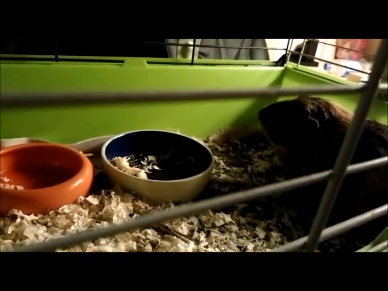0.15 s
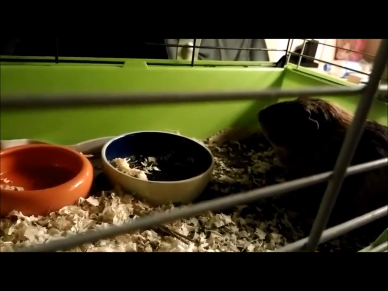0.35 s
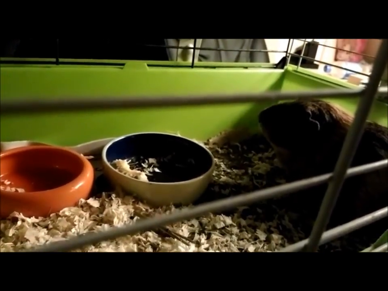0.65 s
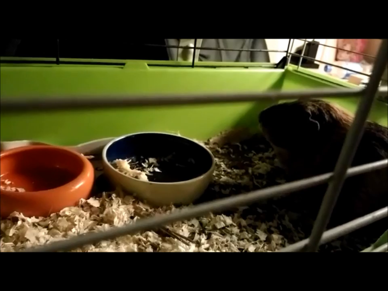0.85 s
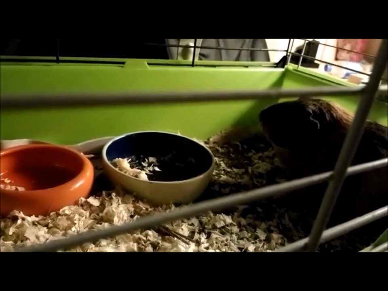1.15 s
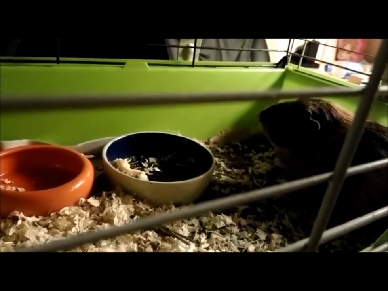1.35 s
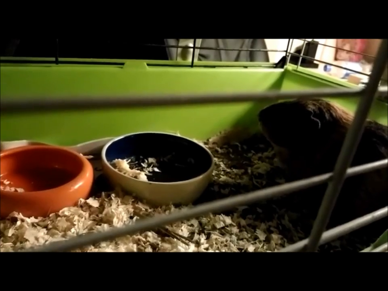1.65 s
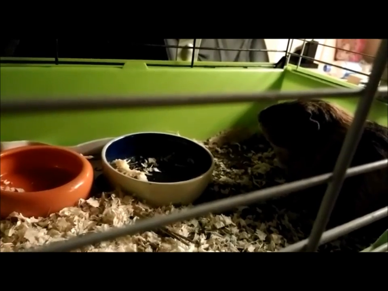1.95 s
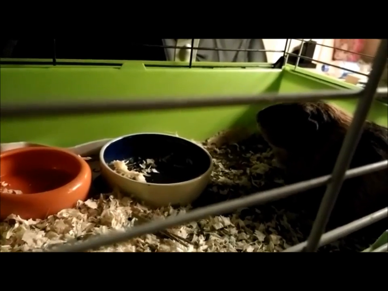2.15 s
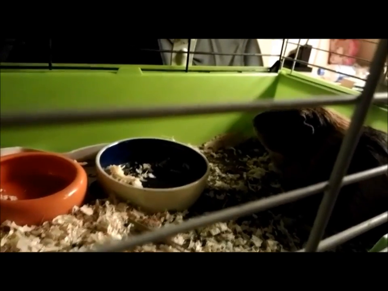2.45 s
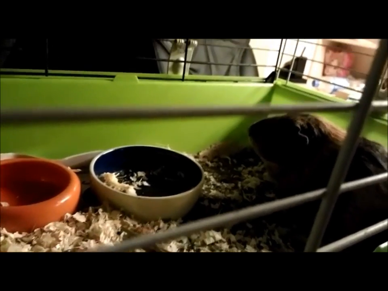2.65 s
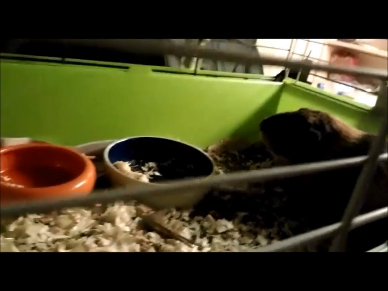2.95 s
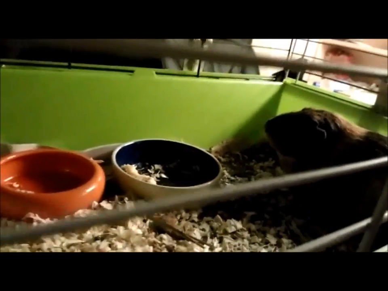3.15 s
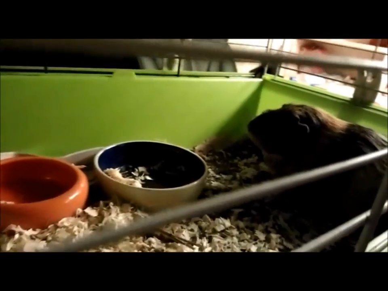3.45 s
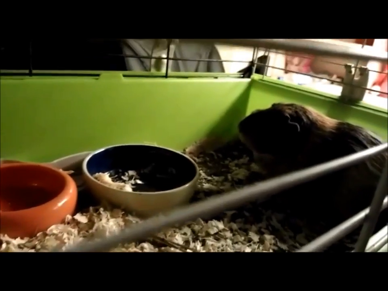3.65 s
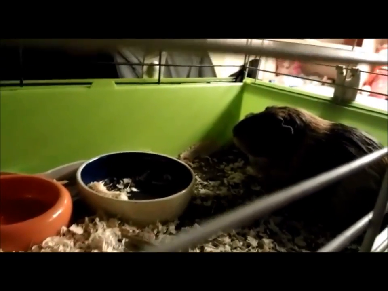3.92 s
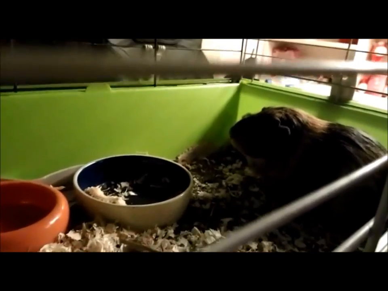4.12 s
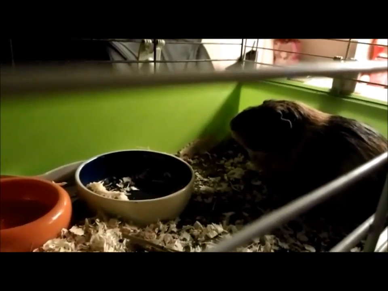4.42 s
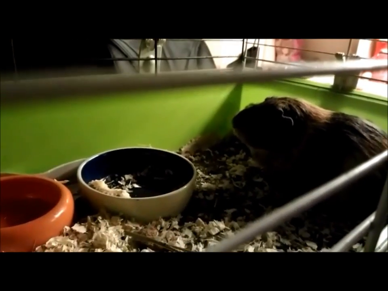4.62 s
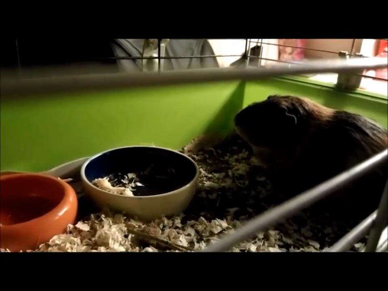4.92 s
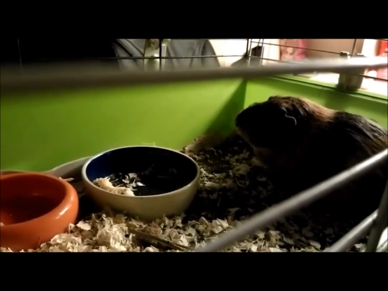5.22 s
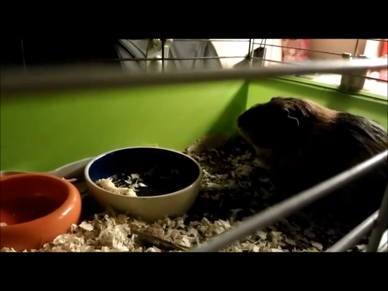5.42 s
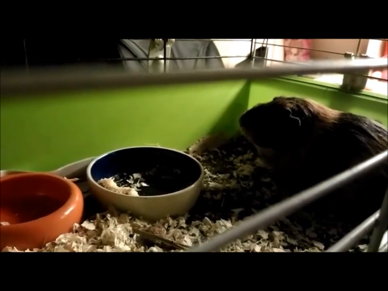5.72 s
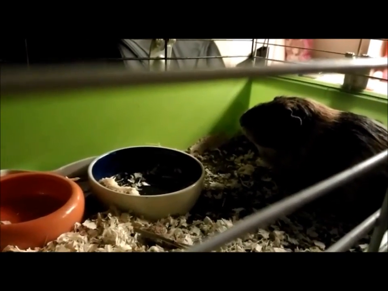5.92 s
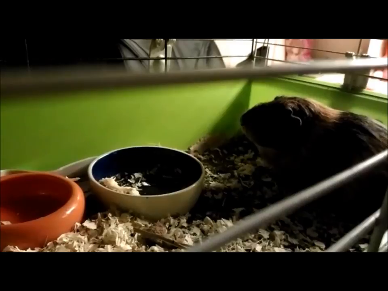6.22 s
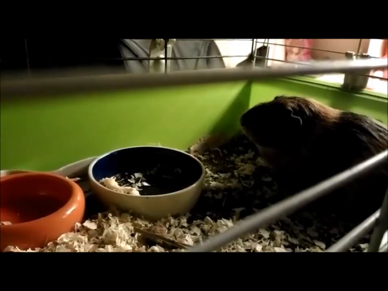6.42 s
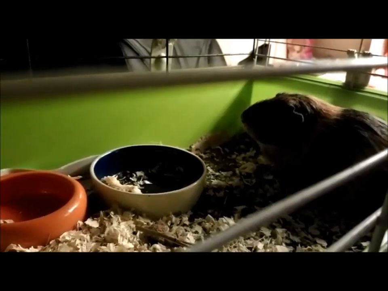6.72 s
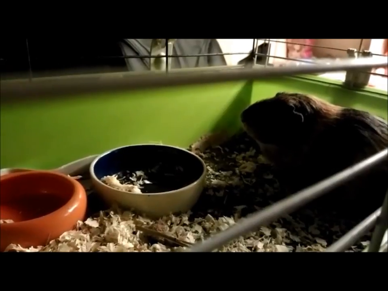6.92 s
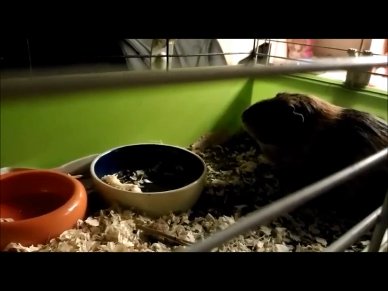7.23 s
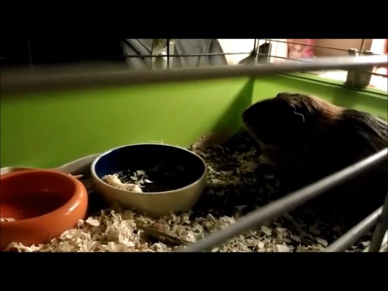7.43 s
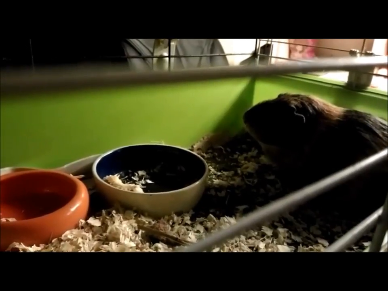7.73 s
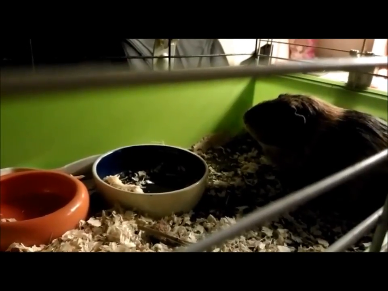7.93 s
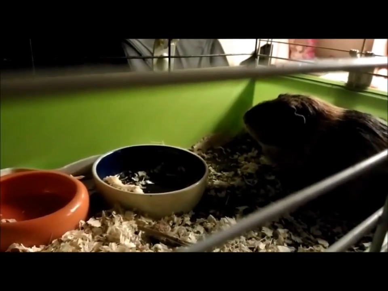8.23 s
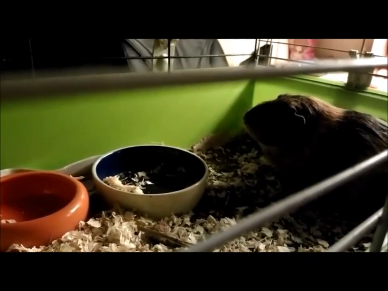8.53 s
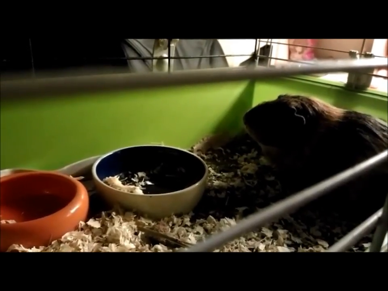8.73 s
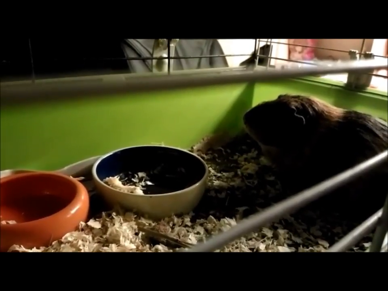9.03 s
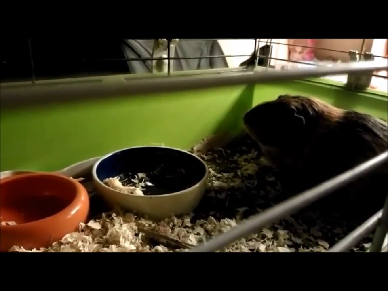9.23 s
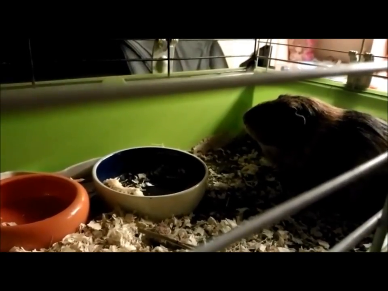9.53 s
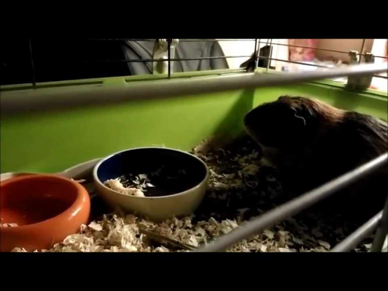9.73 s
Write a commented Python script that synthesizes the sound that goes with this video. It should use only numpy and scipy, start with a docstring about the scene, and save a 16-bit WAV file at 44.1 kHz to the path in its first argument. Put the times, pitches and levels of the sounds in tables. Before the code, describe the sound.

A guinea pig squeaks close to a hand-held microphone in a quiet room. From 0 to 2.9 s it calls steadily, about every 0.22 s: each squeak is a bright whistle of some 0.05 s, falling from roughly 3.6 to 3 kHz with strong overtones, closed by a tiny raspy puff and short echoes of cage walls and room. Around 2.8-2.9 s sharp ticks with a dull tray thump rattle, the last loudest, followed by a soft low bump at 3.0. A duller squeak lingers low at 3.26. Shavings rustle and tick lightly at 3.4-3.8 while the faint room noise sinks. Weak, hoarse calls come at 4.36 and 4.58 with more ticks. From 4.85 the second run builds, a little softer, alternating slightly uneven gaps of 0.2-0.3 s, with barely audible low thuds, continuing to the end near 9.9 s.

```python
"""A plastic cage in a quiet room: a guinea pig squeaks in two long runs, close to a hand-held camera.
Each squeak is a falling whistle whose overtones sweep through fixed throat resonances; a raspy puff ends it.
Between the runs its eagerness flags, and the calls turn dull and linger low.
Cage walls and room answer with decaying noise echoes. Shavings rustle as grainy noise, sharp ticks ring a few
short modes over a tray thump, soft low thuds bump the camera, and it turns the faint room noise down in the pause."""
import sys
import numpy as np
from scipy import signal
from scipy.fft import rfft, irfft, next_fast_len
from scipy.io import wavfile
from scipy.ndimage import map_coordinates

SR = 44100
rng = np.random.default_rng(int(sys.argv[2]) if len(sys.argv) > 2 else 0)


def pcm_store(signal):
    """Save signal as 16-bit PCM."""
    levels = np.round(np.clip(np.atleast_2d(signal), -1, 1) * 32767)
    wavfile.write(sys.argv[1], SR, levels.astype(np.int16).T)


N = 435266

# relative spectrum of the raspy breath: frequency_hz, density_db (per Hz)
BREATH_COLOUR = [(70, -33), (250, -8.5), (500, -18.5), (900, -23.5), (1300, -16.5), (2000, -8.5),
                 (3200, -14.5), (4200, -19.5), (5300, -17.5), (8000, -16), (9300, 0), (10900, 1.5),
                 (12500, -12), (14000, -10.5)]
ONSET_S = .003  # attack of a squeak's gate; also the shortest fall or linger of its pitch


def amp(db):
    """Decibels to gain."""
    return 10 ** (np.asarray(db) / 20)


def unit(x):
    """x at rms 1."""
    return x / np.sqrt(np.mean(x ** 2) + 1e-20)


def along(points, hz):
    """Values of (frequency_hz, value) points, read on a log frequency axis."""
    point_hz, values = np.transpose(points)
    return np.interp(np.log(hz + 1), np.log(np.sort(point_hz)), values)


def filtered(x, gain):
    """x times a gain that depends on frequency."""
    size = next_fast_len(len(x) + 8192)
    spectrum = rfft(x, size) * gain(np.fft.rfftfreq(size, 1 / SR))
    return irfft(spectrum, size)[:len(x)]


def noise(colour, size):
    """Coloured noise of rms 1."""
    white = rng.standard_normal(size)
    return unit(filtered(white, lambda hz: amp(along(colour, hz))))


def wobble(rate, size):
    """A smooth random curve, rate knots a second."""
    knots = rng.standard_normal(size // 8 + 4)
    return map_coordinates(knots, [np.arange(size) * rate / SR], mode="mirror")


def add(track, start_s, sound):
    """Mix a sound into a track; whatever lies outside the scene is cut off."""
    start = round(start_s * SR)
    part = sound[max(0, -start):max(0, N - start)]
    track[max(0, start):][:len(part)] += part


def with_echoes(x, echoes, echo_db):
    """Direct sound plus an echo pattern scaled to a total energy of echo_db."""
    response = amp(echo_db) * echoes / np.linalg.norm(echoes)
    response[0] += 1
    return signal.fftconvolve(x, response)


def room(x, wet_db=-14.5, build_s=0.011):
    """A short sound with the room's diffuse tail, which builds up, then decays at a rate set by frequency."""
    # decay time of the room: frequency_hz, t60_s
    room_decay = [(200, 0.17), (3000, 0.26), (7000, 0.3), (11000, 0.18), (14000, 0.18)]
    hz, t, bands = signal.stft(rng.standard_normal(SR // 2), SR, nperseg=256)
    decay = amp(-60 * t / along(room_decay, hz)[:, None])
    tail = signal.istft(bands * decay, SR, nperseg=256)[1]
    build_up = 1 - np.exp(-np.arange(len(tail)) / SR / build_s)
    return with_echoes(x, tail * build_up, wet_db)


def walls(x, echo_db, t60_s=0.071, first_echo_s=.007):
    """Direct sound and its quick echoes off the cage walls: decaying noise after a short gap."""
    t = np.arange(SR // 8) / SR
    echoes = rng.standard_normal(len(t)) * amp(-60 * t / t60_s) * (t > first_echo_s)
    return with_echoes(x, echoes, echo_db)


def room_noise(gain_db=2, flutter_db=1):
    """Faint indoor rumble and hiss, turned down by the camera in the pause, with a small random flutter of level."""
    # level before gain_db: time_s, level_db
    floor_level = [(0, -75.5), (2.899, -75), (3.9, -81), (4.9, -76.5), (9.87, -76)]
    # relative spectrum: frequency_hz, density_db (per Hz)
    floor_colour = [(25, -9), (37, -14), (48, -4), (62, -10), (85, 4.5), (102, -1), (200, -3.5),
                    (300, -7.5), (500, -9.5), (900, -11.5), (1800, -10), (4500, -18), (14000, -24)]
    level_db = np.interp(np.arange(N) / SR, *np.transpose(floor_level))
    return amp(level_db + gain_db + flutter_db * wobble(20, N)) * noise(floor_colour, N)


def bumps(gain_db=-3, bump_hz=130, rise_s=0.008):
    """The hand shifts on the camera body: low noise that swells and dies within a few hundredths of a second."""
    # soft bumps: peak_s (when it swells highest), level_db (before gain_db)
    hand_bumps = [(0.098, -51), (2.525, -54), (2.991, -39), (6.087, -51), (6.817, -53.5), (7.539, -51.5),
                  (9.346, -53)]
    track, t = np.zeros(N), np.arange(SR // 8) / SR
    swell = t / rise_s * np.exp(-t / rise_s)
    for peak_s, level_db in hand_bumps:
        thud = noise([(bump_hz / 2, -14), (bump_hz, 0), (bump_hz * 2, -12), (1000, -50)], len(t))
        add(track, peak_s - rise_s, amp(level_db + gain_db) * thud * swell)
    return track


def shavings(grain_db=6):
    """Dry flakes crackle under the feet: noise with fast random swings of level."""
    # stirs of the feet: centre_s, spread_s (to 1/e on either side), level_db
    stirs = [(2.822, 0.03, -61.5), (3.447, 0.084, -69), (3.584, 0.045, -65.5), (3.729, 0.011, -74),
             (3.813, 0.011, -72), (4.116, .09, -83), (4.358, 0.0047, -55), (4.529, .02, -67)]
    # relative spectrum of the rustle: frequency_hz, density_db (per Hz)
    rustle_colour = [(300, 0), (1500, -5.5), (5000, -14), (8000, -15.5), (11500, -1), (14000, -5)]
    t = np.arange(N) / SR
    stir = sum(amp(level_db) * np.exp(-np.minimum(((t - centre_s) / spread_s) ** 2, 20))
               for centre_s, spread_s, level_db in stirs)
    grain = amp(grain_db * np.clip(wobble(400, N), -2, 2))
    return stir * unit(noise(rustle_colour, N) * grain)


def ticks(tick_db=0, crack_db=-7, thump_gain_db=0, thump_t60_s=0.019):
    """Small hard contacts: ringing modes and a noise crack on top of a dull thump of the plastic tray."""
    # sharp ticks in the cage: start_s, level_db, thump_db (relative to level_db)
    contacts = [(2.812, -42, -20), (2.8393, -32.5, -7), (2.9007, -21.5, -12.5), (3.466, -45.5, -28),
                (3.491, -41.5, -26), (3.541, -50.5, -15), (4.353, -38.5, -21), (4.553, -48, -21),
                (4.5694, -38.5, -29), (4.843, -45.5, -19.5)]
    # what a tick rings with: frequency_hz, level_db (relative to the tick), t60_s
    modes = [(4080, -20.5, .018), (5230, -10.5, 0.0046), (8410, -3, 0.00087), (9740, 2, 0.0038),
             (13700, -15.5, .002)]
    # relative spectrum of the tray thump: frequency_hz, density_db (per Hz)
    tray_colour = [(30, -19), (70, -18.5), (200, 4.5), (400, -11), (800, -22), (1600, -31.5), (4000, -36.5)]
    track, t = np.zeros(N), np.arange(SR // 20) / SR
    for start_s, level_db, thump_db in contacts:
        # each contact excites the modes slightly differently
        snap = sum(amp(mode_db + rng.normal(0, 0.76) - 60 * t / t60_s) * np.sin(2 * np.pi * hz * t)
                   for hz, mode_db, t60_s in modes)
        crack = amp(crack_db - 60 * t / 0.0015) * noise([(1500, -14.5), (5500, 1), (12000, 2)], len(t))
        thump = amp(thump_db + thump_gain_db - 60 * t / thump_t60_s) * noise(tray_colour, len(t))
        add(track, start_s, room(amp(level_db + tick_db) * (snap + crack + thump), wet_db=-25))
    return track


def glide(t, length, top_hz, hold, end_hz, linger, jitter, bend=1.84,
          scoop_hz=120, scoop_s=0.004, sag_hz_per_s=12500):
    """Pitch of a squeak: it scoops up, holds and falls; a listless one then lingers low and finally sags."""
    linger = np.clip(linger, 0, length / 2)
    low_hz = end_hz + sag_hz_per_s * linger  # the longer the linger, the further it sags to the end pitch
    fall = np.clip((t - hold) / max(length - linger - hold, ONSET_S), 0, 1) ** bend
    sag = (low_hz - end_hz) * np.clip((t - length + linger) / max(linger, ONSET_S), 0, 2) ** 2
    scoop = scoop_hz * np.exp(-t / scoop_s)
    pitch = top_hz - (top_hz - low_hz) * fall - sag - scoop
    return pitch * (1 + jitter * wobble(500, len(t)))


def squeak(t, length, linger, pitch, levels_db, dull_db=6, ring_db_per_s=700, low_hz=3000,
           rasp_db=-45, opening_db=6.5, opening_share=0.16):
    """A whistle drags its overtones through fixed throat resonances, with a faint rasp of air on it."""
    # push of air through one squeak: share_of_length, level_db
    effort = [(0, -13), (.2, -2.5), (.45, 1), (.75, 0), (1, -23)]
    # response of throat and mouth: frequency_hz, gain_db
    throat = [(2400, -0.5), (2850, -9), (3350, -15), (3650, -17.5), (3800, -13.5), (4900, -42),
              (5400, -26.5), (5750, -45), (6200, -25.5), (6900, -33.5), (7300, -22.5), (8500, -31),
              (9100, -23.5), (9900, -24.5), (10650, -10.5), (11200, -16.5), (12500, -30), (14000, -19.5)]
    phase = 2 * np.pi * np.cumsum(pitch) / SR
    release = np.clip((length - t) / (2 * ONSET_S) + 1, 0, 1)
    gate = np.clip(t / ONSET_S, 0, 1) * release
    push = amp(np.interp(t / length, *np.transpose(effort))) * np.sin(gate * np.pi / 2) ** 2
    # overtones swell as the mouth opens and fade as the air runs out
    fade_db = dull_db * np.clip(2 * t / length - 1, 0, 1) ** 2
    fade_db = fade_db + opening_db * np.clip(1 - t / (opening_share * length), 0, 1)
    # a low lingering note is pressed out and keeps its overtones
    ring_db = ring_db_per_s * linger * np.clip((low_hz - pitch) / 150, 0, 1)
    whistle = 0
    for k, level_db in enumerate(levels_db, 1):
        harmonic_db = level_db - (k - 1.5) * fade_db + (k > 1) * ring_db + along(throat, k * pitch)
        whistle = whistle + amp(harmonic_db) * np.sin(k * phase)
    rasp = amp(levels_db[0] + rasp_db) * noise(BREATH_COLOUR, len(t))
    return push * (whistle + rasp)


def puff(centre, lead_db=-13):
    """Air leaks through the end of the whistle and peaks in one grainy burst."""
    burst_s, leak_s, grain_db = .007, .032, 2.5  # Gaussian spreads and depth of the grain
    t = np.arange(SR // 5) / SR
    burst = np.exp(-.5 * ((t - centre) / burst_s) ** 2)
    leak = amp(lead_db) * np.exp(-.5 * ((t - centre) / leak_s) ** 2) * np.minimum(t / centre, 1)
    grain = amp(grain_db * wobble(600, len(t)))
    return (burst + leak) * unit(noise(BREATH_COLOUR, len(t)) * grain)


def guinea_pig(voice_db=0):
    """Each squeak is an arc and a puff, duller, hoarser and lingering low when listless; echoes vary by call."""
    # squeaks: start_s, length_s, top_pitch_hz, end_pitch_hz, level_db (fundamental, before throat and effort)
    squeaks = [(-0.0175, 0.05, 3615, 3016, -11.5), (0.211, 0.049, 3582, 2950, -11.5),
               (0.4324, 0.052, 3592, 2950, -11.5), (0.665, 0.054, 3598, 3080, -12),
               (0.8902, 0.053, 3587, 2936, -11.5), (1.1301, 0.051, 3602, 2910, -11.5),
               (1.3397, 0.057, 3582, 2967, -10.5), (1.588, 0.05, 3561, 2970, -10.5),
               (1.8009, 0.057, 3549, 2803, -10.5), (2.0615, 0.053, 3610, 2967, -12.5),
               (2.2593, 0.061, 3593, 2960, -10.5), (2.493, 0.054, 3587, 2930, -11.5),
               (2.7103, 0.059, 3585, 2954, -10.5), (2.9263, 0.054, 3605, 3097, -12.5),
               (3.261, 0.052, 3666, 2626, -9), (4.3569, 0.035, 3620.0, 2590, -17.5),
               (4.5754, 0.02, 3445, 3220, -25), (4.846, 0.055, 3735, 3100, -15),
               (5.0464, 0.06, 3732, 2960, -13.0), (5.2883, 0.062, 3695, 2940, -14),
               (5.499, 0.06, 3730, 2970, -13.0), (5.7449, 0.055, 3702.0, 2990, -15.5),
               (5.9571, 0.059, 3678, 2950, -13.0), (6.205, 0.059, 3670, 2516, -15.5),
               (6.448, 0.052, 3692, 2974, -13.5), (6.6617, 0.06, 3637, 3076, -13),
               (6.901, 0.052, 3613, 2780, -14), (7.1085, 0.061, 3608, 3004, -14),
               (7.3402, 0.06, 3612, 2837, -14), (7.5441, 0.062, 3636, 2938, -12.5),
               (7.8032, 0.056, 3632, 2896, -14.5), (8.003, 0.06, 3607, 3000, -13.5),
               (8.2924, 0.057, 3600, 2850, -15), (8.5163, 0.06, 3564, 2924, -13),
               (8.7636, 0.057, 3633, 2936, -15), (8.9605, 0.06, 3624, 3094, -12.5),
               (9.2533, 0.051, 3645, 2888, -14.5), (9.45, 0.06, 3620, 3003, -11),
               (9.7102, 0.058, 3637, 2970, -14)]
    # how eagerly the animal calls, flagging between the runs: time_s, eagerness (0-1)
    eagerness = [(2.93, 0.89), (3.26, 0.5), (4.36, 0.5), (4.58, 0.51), (4.85, 0.75), (5.1, .88), (7.1, 0.9),
                 (9.87, 0.8)]
    # treble of a fully eager squeak, relative to the fundamental: time_s, third_harmonic_db, fourth_harmonic_db
    treble = [(0, 6, -6), (1.6, 6, -7), (2.26, 7, -3), (2.9, 5, -6.5), (5.4, 5, -2.5), (6.5, 2.5, -1.5),
              (9.87, 4, 2)]
    second_db = 9.5  # second harmonic of a fully eager squeak, relative to the fundamental
    slack_db = 21  # loss of the upper harmonics when all eagerness is gone
    hold_share = .26  # part of the arc spent at the top pitch
    linger_share = .65  # part of a wholly listless squeak spent on its low end note
    eager_jitter, slack_jitter = 0.0011, .014  # relative pitch tremor; extra when listless and hoarse
    puff_wait_s = .0125  # from the end of the whistle to the puff
    puff_db, puff_slack_db = -47, 8.5  # puff of a fully eager squeak; loss in a listless one

    track, t = np.zeros(N), np.arange(SR // 10) / SR
    treble_s, thirds_db, fourths_db = np.transpose(treble)
    for start_s, length, top_hz, end_hz, level_db in squeaks:
        slack = 1 - np.clip(np.interp(start_s, *np.transpose(eagerness)), 0, 1)
        linger = linger_share * slack * length
        hold = hold_share * (length - linger)
        jitter = eager_jitter + slack_jitter * slack
        pitch = glide(t, length, top_hz, hold, end_hz, linger, jitter)
        third_db = np.interp(start_s, treble_s, thirds_db)
        fourth_db = np.interp(start_s, treble_s, fourths_db)
        upper_db = np.array([second_db, third_db, fourth_db]) - slack_db * slack
        levels_db = level_db + np.append(0, upper_db)
        call = amp(puff_db - puff_slack_db * slack) * puff(length + puff_wait_s)
        add(call, 0, amp(voice_db) * squeak(t, length, linger, pitch, levels_db))
        # new echoes for every call, as the head moves
        add(track, start_s, room(walls(call, echo_db=-13.0)))
    return track


def scene():
    """All sources at the one microphone."""
    return (room_noise() + bumps() + shavings() + ticks() + guinea_pig())[None]


def record(dry, mirror_db=-29, bass_hz=65):
    """The camera mirrors the treble faintly about 8 kHz, thins the deep bass and cuts the top steeply."""
    # treble that gets mirrored: frequency_hz, gain_db (before mirror_db)
    mirror = [(5000, -62), (6500, -6.5), (7300, 13.5), (10700, -6.5), (12500, -49.5)]
    # top end of the microphone: frequency_hz, gain_db
    microphone = [(14150, 0), (14350, -18), (14550, -42), (14800, -50)]
    carrier_hz, top_hz = 16000, 15700  # twice the mirror frequency; nothing passes from top_hz up
    treble = filtered(dry[0], lambda hz: amp(along(mirror, hz)))
    carrier = np.cos(2 * np.pi * carrier_hz * np.arange(N) / SR)
    sound = dry[0] + amp(mirror_db) * treble * carrier

    def response(hz):
        low_cut = hz ** 2 / np.sqrt(hz ** 4 + bass_hz ** 4)
        return low_cut * amp(along(microphone, hz)) * (hz < top_hz)

    return filtered(sound, response)[None]


dry = scene()
out = record(dry)
pcm_store(out)
```